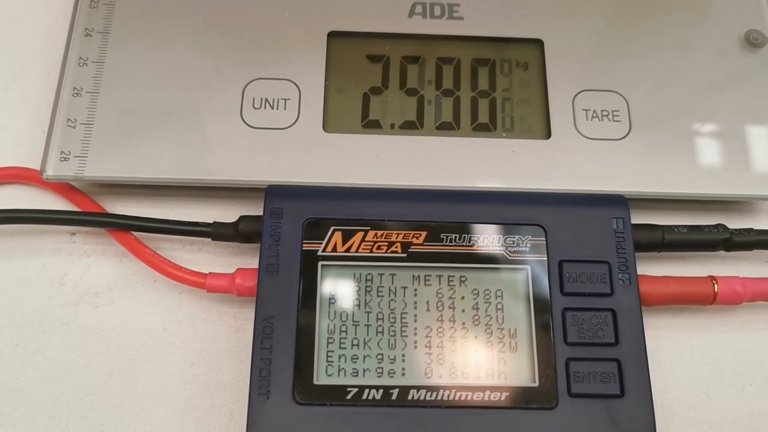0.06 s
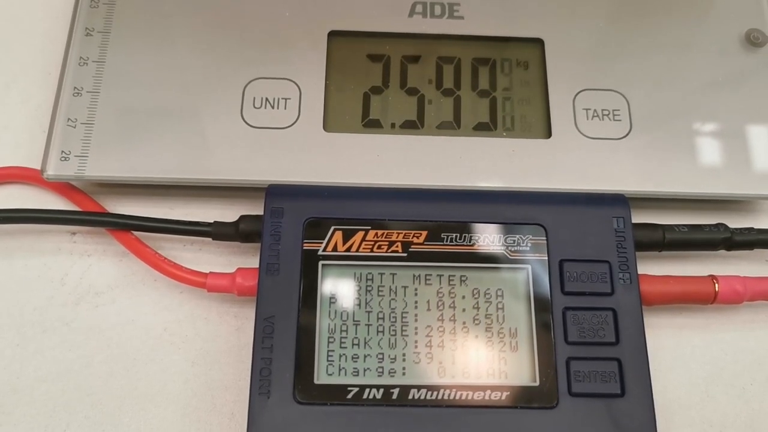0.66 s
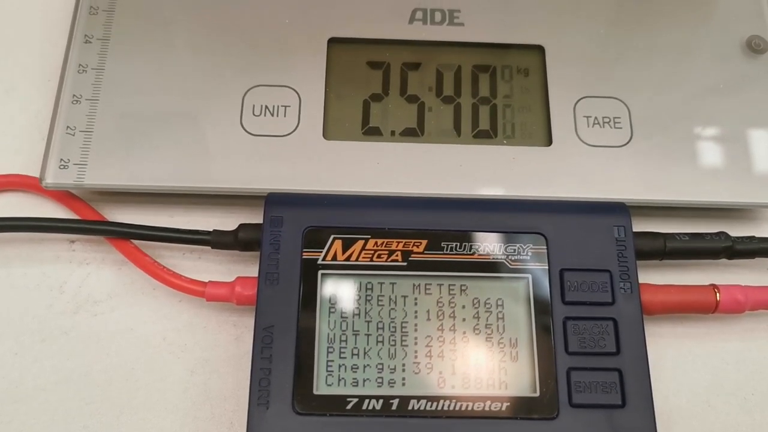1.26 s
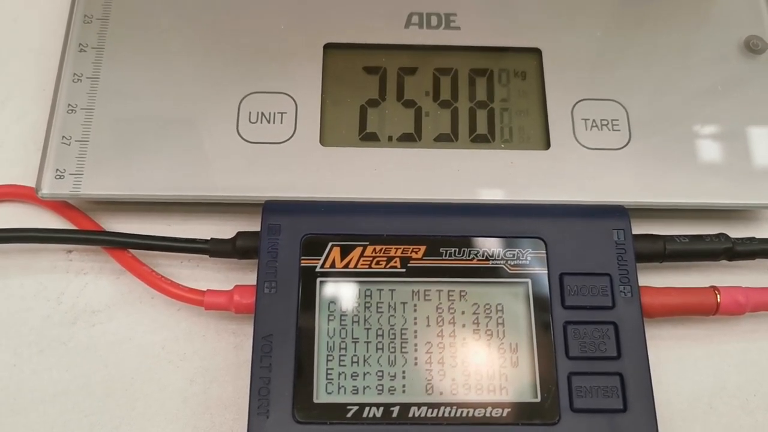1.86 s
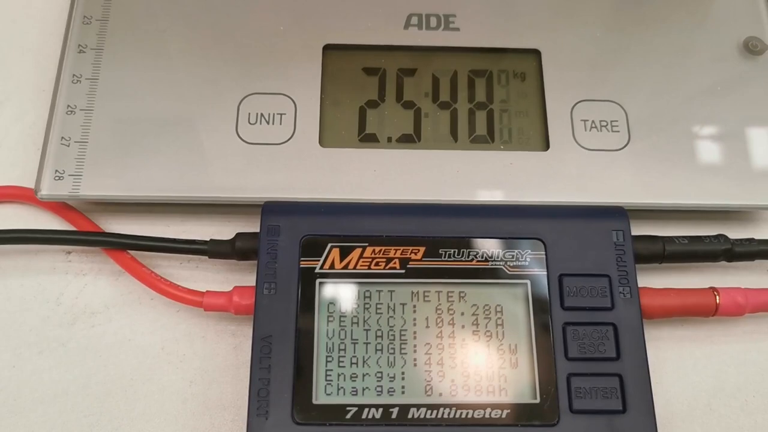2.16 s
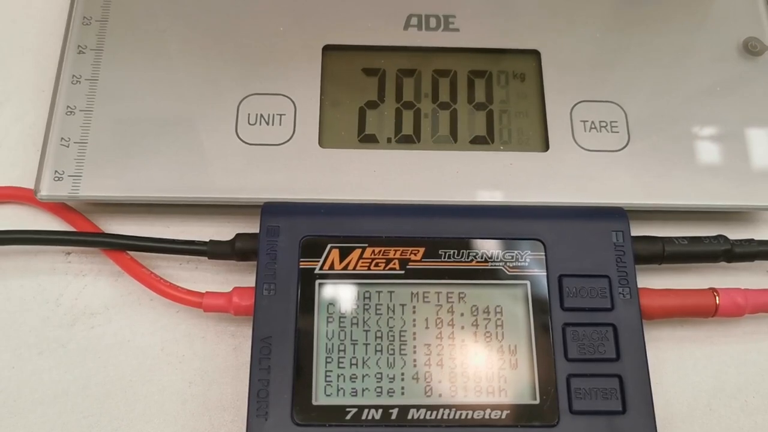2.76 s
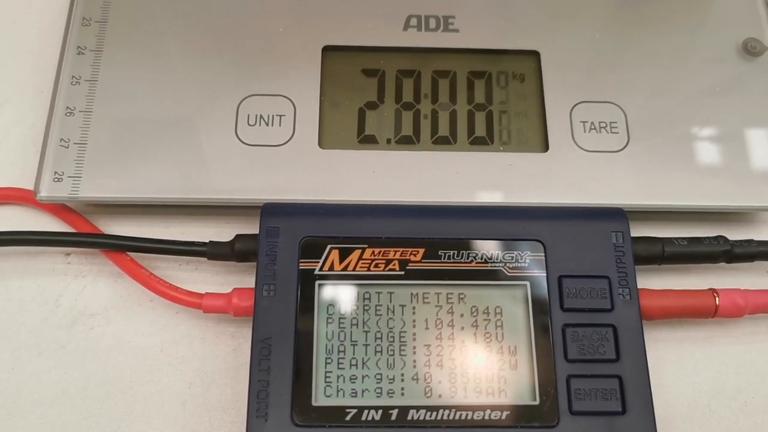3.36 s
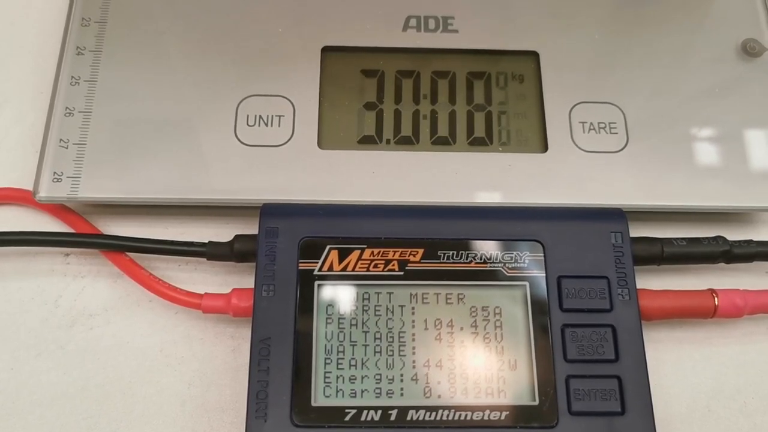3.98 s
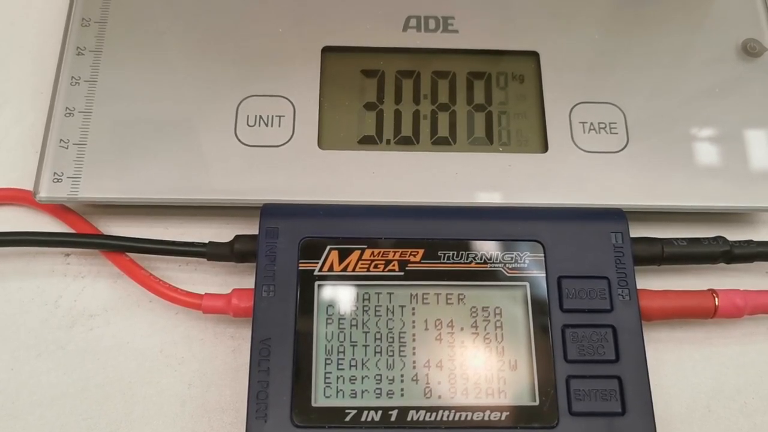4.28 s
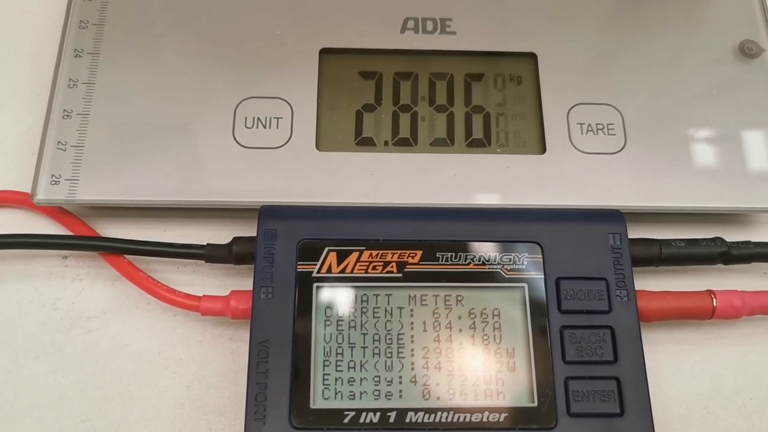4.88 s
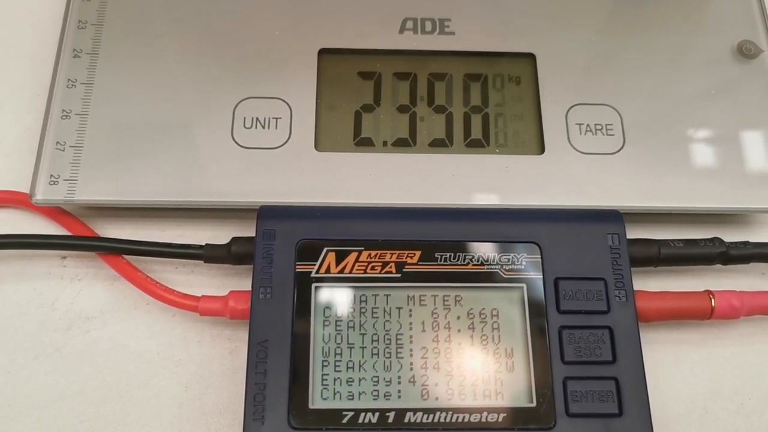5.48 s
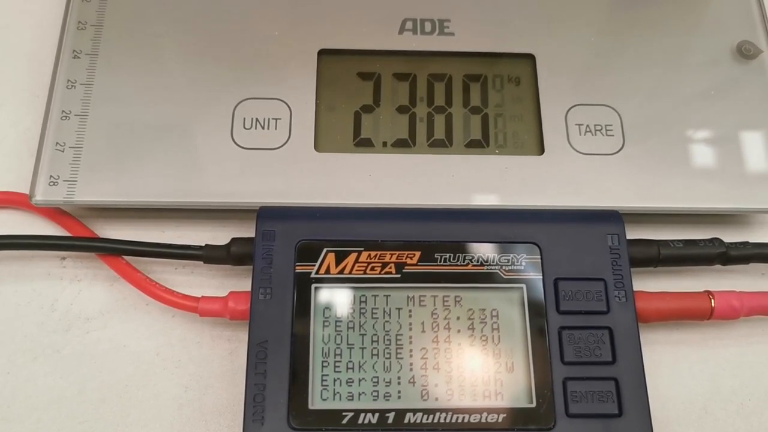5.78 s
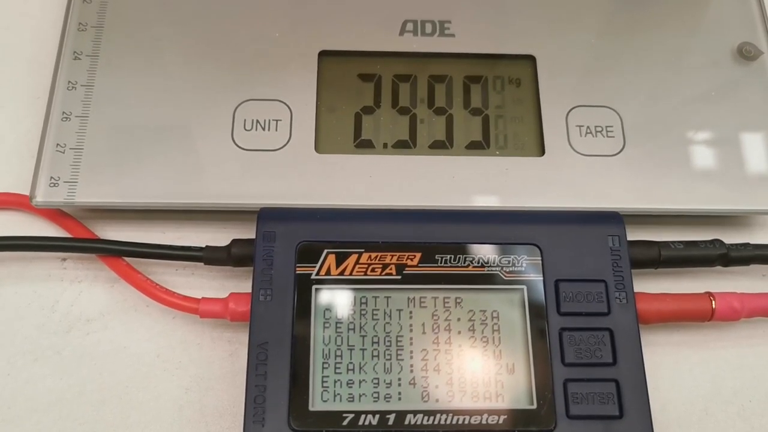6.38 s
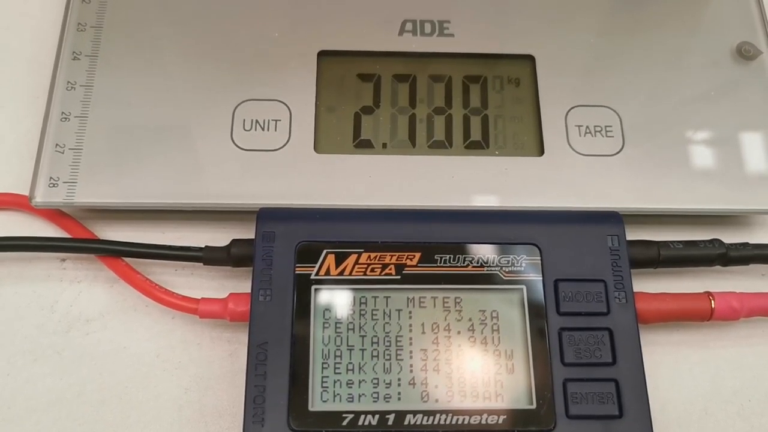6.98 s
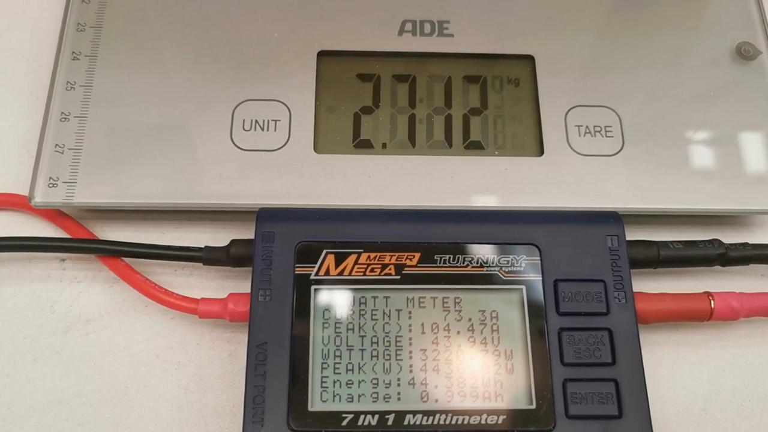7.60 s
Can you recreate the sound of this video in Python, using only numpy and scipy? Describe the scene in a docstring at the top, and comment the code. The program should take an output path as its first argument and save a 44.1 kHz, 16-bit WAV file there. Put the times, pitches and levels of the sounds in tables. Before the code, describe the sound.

Close up in a small room, an electric ducted fan is already running hard, with a shrill whine above rushing, hissing air. After about two seconds it speeds up, and a bearing sings faintly at the top. The wavering whine then drops lower than it began, rises again and settles. Soft gusts buffet the microphone underneath.

```python
"""A twelve-blade electric ducted fan runs near full power on a stand in a small room, close to a phone.
At first the blades whine at a steady pitch over the jet's roar, the inlet's hiss and a draught that
buffets the microphones. From 2.2 s the fan speeds up: the gliding whine flutters against its own echo,
and around 4 s a bearing sings at top speed. By 5.2 s the pitch has sunk below where it began;
it then climbs part way back and holds from 6.4 s."""
import sys
import numpy as np
from scipy import signal
from scipy.fft import rfft, irfft
from scipy.io import wavfile
from scipy.ndimage import uniform_filter1d

SR = 44100
rng = np.random.default_rng(int(sys.argv[2]) if len(sys.argv) > 2 else 0)


def dump(signal):
    """Clip the signal to [-1, 1] and save it as 16-bit WAV at the path in sys.argv[1]."""
    limited = np.clip(np.atleast_2d(signal).T, -1, 1)
    pcm = np.round(limited * 32767).astype(np.int16)
    wavfile.write(sys.argv[1], SR, pcm)


N = 341329
TIME = np.arange(N) / SR
FREQ = np.maximum(np.arange(N // 2 + 1) * SR / N, 1)
SIDES = np.array([[1], [-1]])  # opposite signs for the left and right microphone ports


def blade_whine(phase, blade_hz, unsettled):
    """Periodic blade loading radiates a tone; a glide drags standing-wave nodes across the ports."""
    # how the whine carries at each blade rate: f/Hz, left level/dB, right level/dB
    carry = [(6730, -15, -14.5), (6832, -20, -12.5), (7045, -17, -16), (7050, -18.5, -18),
             (7260, -19.5, -19.5), (7500, -20.5, -22.5), (7530, -22, -22)]
    # the left port passes through a node and its phase reverses: t/s, length/s
    flips = [(2.792, 0.027), (2.874, 0.043), (2.963, 0.055), (3.187, 0.017), (3.367, 0.042), (3.481, 0.022),
             (3.694, 0.024), (3.906, 0.069), (4.435, 0.041), (5.056, 0.057), (5.848, 0.072)]
    # a port drifts into a node: t/s, length/s, left gain/dB, right gain/dB
    dips = [(.48, 0.29, -9.5, -0.5), (0.823, 0.26, -4.5, -1), (1.287, 0.6, -5.5, 0),
            (2.526, 0.023, -12, -15), (3.126, 0.017, -12, -13), (3.286, 0.011, -10, -9),
            (4.242, 0.012, -9, -11), (5.586, 0.083, -4, -6.5), (5.864, 0.049, 0.5, -0.5),
            (5.98, .06, -4, -1), (6.11, 0.028, -6, -5)]
    node_hz, node_width_hz, node_rad = 6768, 31, 3.18  # at this pitch a node lies between the ports
    flutter_rad, flutter_hz = 0.41, 30  # the phase between the ports shakes during a glide
    tone = in_room(np.exp(1j * phase), t60=0.37, shared_db=8, own_db=-6, hold_s=0.051, flatten=0.38)
    port_phase = node_rad * np.exp(-((blade_hz - node_hz) / node_width_hz) ** 2)
    port_phase += flutter_rad * unsettled * wander(flutter_hz)
    tone = tone * ragged(0, depth=0.059, hz=156) * np.exp(0.5j * SIDES * port_phase)
    tone[0] *= 1 - 2 * np.minimum(sum(swell(t, length) for t, length in flips), 1)
    dip_db = sum(np.array([[left], [right]]) * swell(t, length) for t, length, left, right in dips)
    return tone.real * undb(by_speed(carry, blade_hz) + dip_db)


def blade_octave(phase, blade_hz, unsettled, surge_db):
    """The second harmonic of blade passage follows the surges and gains on the right during a glide."""
    # how the octave carries at each blade rate: f/Hz, left level/dB, right level/dB
    carry = [(6720, -34, -28), (7080, -28, -33.5), (7080, -29.5, -29), (7700, -38, -34)]
    tone = ragged(2 * phase, depth=0.067, hz=60)
    tone = in_room(tone, t60=0.45, shared_db=4.5, own_db=-7, hold_s=0.48, flatten=0)
    level_db = by_speed(carry, blade_hz) + 0.96 * surge_db
    level_db[1] += 8.5 * unsettled
    return undb(level_db) * (tone * ragged(0, depth=0.17, hz=45)).real


def folded_whine(phase, blade_hz, unsettled):
    """Aliasing: the converter folds the ultrasonic fifth harmonic down, so it glides the opposite way."""
    # strength of the alias at each blade rate: f/Hz, level/dB
    strength = [(6765, -44), (6810, -58), (7030, -39.5), (7270, -42), (7500, -57), (7700, -51)]
    converter_hz = 48000
    tone = ragged(2 * np.pi * converter_hz * TIME - 5 * phase, depth=0.6, hz=35)
    tone = in_room(tone, t60=0.25, shared_db=-13, own_db=-7, hold_s=0.25, flatten=0)
    return undb(by_speed(strength, blade_hz) - 4 * unsettled + wander(7.7) - SIDES * 3.3) * tone.real


def machinery(shaft_phase, blade_hz, unsettled):
    """Forced vibration: rotor and motor hum most at steady speed; shaft and bearing sing near the top."""
    # rotor unbalance and motor: multiple of the shaft rate, level/dB
    hum_orders = [(4, -47.5), (6, -51), (8, -48), (10, -56), (11, -56), (16, -58), (22, -66)]
    # shaft wobble, a bearing and its mixing with the blade tones: multiple of the shaft rate, level/dB
    strain_orders = [(1, -51), (2, -48), (5.43, -43), (6.57, -49), (17.43, -69), (18.57, -40)]
    strain = np.clip((blade_hz - 7300) / 300, 0, 1)
    hum = order_tones(shaft_phase, hum_orders, depth=0.56, hz=5.1)
    singing = order_tones(shaft_phase, strain_orders, depth=2.6, hz=7.8)
    return (1 - unsettled) * hum + strain * singing


def air_stream(throttle, unsettled, surge_db):
    """Broadband flow noise: the rush flutters in level, and swings left and right as the pitch glides."""
    swing_db = 3 * unsettled * wander(28)
    left_db = -24.5 - 0.5 * throttle + 0.5 * unsettled + surge_db[0] - 0.65 * swing_db
    right_db = -28 + 5 * throttle + 4.5 * unsettled + surge_db[1] + swing_db
    roar = jet_roar() * undb([left_db, right_db])
    flutter_db = wander(24)
    hiss = inlet_hiss(throttle, unsettled, surge_db, roar_lean_db=left_db - right_db)
    return (roar + hiss) * undb(flutter_db)


def jet_roar():
    """Resonance of duct and stand colours the jet's noise; long waves reach both ports partly coherent."""
    # jet spectrum at each port: f/Hz, relative spectrum level/dB
    left_spectrum = [(20, -6), (120, -3), (300, -1), (450, -2), (800, -3.5), (1100, 0.5), (1400, -1.5),
                     (2700, -1.5), (3200, -4), (4800, -5), (6000, -9), (7800, -15), (10500, -22),
                     (15500, -5.5)]
    right_spectrum = [(20, 2), (150, 0.5), (480, -1), (700, 1.5), (1000, 0.5), (1400, 2.5), (1900, -5.5),
                      (2800, -0.5), (3200, -5), (6000, -4), (7800, -10), (9800, -16), (11800, -5),
                      (15500, -8)]
    # resonances of duct and stand: f/Hz, width/Hz, left gain/dB, right gain/dB
    resonances = [(625, 99, 6, 6.5), (725, 103, 3, 5), (948, 66, 7, -1), (1140, 75, 7.5, -3),
                  (1242, 47, 2, 6.5), (1560, 120, -2, 1), (2205, 950, 0.5, 7.5), (3470, 280, 1, 0),
                  (10880, 280, 12, 13.5), (12800, 1300, -20, 1)]
    right_lag_s = 0.00012
    duct_db = sum(np.array([[left], [right]]) / (1 + (2 * (FREQ - hz) / width) ** 2)
                  for hz, width, left, right in resonances)
    shape = undb(np.array([colour(left_spectrum), colour(right_spectrum)]) + duct_db)
    alike = 0.25 / (1 + (FREQ / 900) ** 4)
    shared, *own = rfft(rng.standard_normal((3, N)))
    shared = shared * np.exp(1j * np.pi * FREQ * right_lag_s * SIDES)
    left, right = irfft(shape * (np.sqrt(alike) * shared + np.sqrt(1 - alike) * np.array(own)), N)
    return np.array([unit(left), unit(right)])


def inlet_hiss(throttle, unsettled, surge_db, roar_lean_db):
    """Flow noise at the inlet grows with speed and in glides; its left-right balance follows the roar's."""
    # inlet spectrum: f/Hz, relative spectrum level/dB
    spectrum = [(20, -44), (4000, -61), (6500, 12.5), (8500, 5), (10500, 11.5), (13000, 7), (15500, 6)]
    level_db = -34.4 + 3.5 * np.maximum(throttle, 0) + 1.6 * unsettled + 0.96 * surge_db.mean(axis=0)
    lean_db = 0.3 * roar_lean_db - 0.6
    return pair(colour(spectrum), alike=1) * undb(level_db + wander(28) + SIDES * lean_db / 2)


def draught():
    """Turbulent pressure rumbles on each port almost independently; a few gusts hit harder."""
    # course of the draught: t/s, relative level/dB, left minus right/dB
    course = [(0.0, -42, -2), (0.21, -41, 11), (0.34, -40.5, -14.5), (0.97, -37.5, -4), (2.18, -36.5, 2),
              (2.24, -35, -21), (2.35, -36, -1.5), (3.86, -33.5, 17), (4.46, -30.5, 3), (5.02, -33.5, -10),
              (5.41, -43, 2), (5.65, -40, -13.5), (6.14, -29.5, -9), (6.45, -35.5, 1.5),
              (7.59, -36.5, -2.0), (7.74, -38, -4)]
    # draught spectrum: f/Hz, relative spectrum level/dB
    spectrum = [(5, -3), (25, -2), (50, -6), (100, -10.5), (200, -18.5), (500, -20.5), (2000, -64)]
    # single gusts: t/s, length/s, level/dB, upper edge f/Hz
    gusts = [(2.713, 0.097, -24.5, 90), (3.356, 0.11, -25, 120), (3.816, .1, -29.5, 80),
             (4.546, 0.069, -25, 333), (5.04, 0.068, -32, 109), (6.15, 0.14, -32, 120)]
    level_db, pan_db = curves(course)
    share = undb(SIDES * pan_db / 2)
    rumble = pair(colour(spectrum), alike=0.035) * undb(level_db + 2.6 * wander(7.5))
    rumble *= 1.7 * share / np.hypot(*share)
    for t, length, db, edge_hz in gusts:
        push = np.exp(-2 * ((TIME - t) / length) ** 2)
        rumble += undb(db) * push * pair(-20 * np.log10(1 + (FREQ / edge_hz) ** 2), alike=0.077)
    return rumble


def flow():
    """Shaft speed sets the blade rate and throttle (0 cruise, 1 full); its change sets unrest (0-1)."""
    # blade-passing rate: t/s, f/Hz
    speed = [(0.0, 7043), (0.73, 7029), (2.22, 7022), (2.93, 7472), (3.14, 7489), (3.43, 7650),
             (3.74, 7654), (4.07, 7700), (4.2, 7698), (4.29, 7619), (4.46, 7523), (4.58, 7182),
             (4.86, 7007), (5.08, 6786), (5.23, 6763), (5.49, 6771), (5.97, 6879), (6.4, 7247),
             (6.67, 7247), (6.77, 7273), (7.74, 7264)]
    cruise_hz, full_hz, half_unsettled_hz_per_s = 7025, 7700, 240
    blade_hz = smooth(curves(speed)[0], 0.022)
    glide = smooth(np.abs(np.gradient(blade_hz)) * SR, 0.13)
    throttle = (blade_hz - cruise_hz) / (full_hz - cruise_hz)
    unsettled = glide / (glide + half_unsettled_hz_per_s)
    return blade_hz + 1.02 * wander(6.1), throttle, unsettled


def surges(edge_s=0.0045):
    """Amplitude modulation of the rush, in dB at each port: each surge or lull sets in, holds and ends."""
    # surges and lulls: t/s, length/s, left gain/dB, right gain/dB
    events = [(0.222, 0.22, -0.5, -3), (0.476, 0.18, 1, 0), (.81, 0.16, 0.5, 3.5), (1.029, .08, -0.5, -3.5),
              (1.414, 0.054, 2, 5), (1.95, 0.65, -1, -0.5), (2.395, .15, 0, 2), (2.484, 0.029, -0.5, -6),
              (2.855, 0.033, -0.5, -4.5), (2.907, 0.038, 3, 0.5), (3.058, 0.21, 0, 2.5),
              (3.523, 0.2, -0.5, -1), (3.906, 0.13, -6, 2.5), (4.096, 0.26, -3.5, -4), (4.25, 0.04, 1, 0.5),
              (4.608, 0.056, 0, -1), (5.08, 0.026, -1, 6), (5.3, .33, -2.5, -3), (5.61, 0.14, 0, 6),
              (5.756, 0.04, -0.5, -4), (5.86, .11, -0.5, 5), (5.944, 0.059, 0, -7), (6.357, 0.042, 1, 3.5),
              (6.604, 0.16, 1.5, 2.5), (6.893, 0.31, 1, -2.5), (7.12, 0.1, 1.5, 2), (7.643, .2, 1, -2.5)]
    gain_db = 0
    for t, length, left, right in events:
        held = 0.5 + 0.5 * np.tanh((length / 2 - np.abs(TIME - t)) / edge_s)
        gain_db += np.array([[left], [right]]) * held
    return gain_db


def in_room(tone, t60, shared_db, own_db, hold_s, flatten):
    """Interference: a gliding tone beats with its echoes; flattening the crests leaves brief dropouts."""
    shared = tone + undb(shared_db) * echoes(tone, t60)
    ports = np.array([shared + undb(own_db) * echoes(tone, t60) for _ in range(2)])
    ports = ports / np.sqrt(smooth(np.abs(ports) ** 2, hold_s))  # even out slow changes of level
    ports = ports / (1 + np.abs(ports) ** 2) ** flatten
    return np.sqrt(2) * unit(ports)


def echoes(tone, t60):
    """Reverberation: dense reflections decay exponentially, by 60 dB in t60 seconds."""
    t = TIME[:SR // 2]
    response = rng.standard_normal(len(t)) * np.exp(-np.log(1000) * t / t60)
    response /= np.linalg.norm(response)
    lead_in = np.conj(tone[len(t):0:-1]) * np.exp(2j * np.angle(tone[0]))  # the fan is already running
    return signal.fftconvolve(np.r_[lead_in, tone], response)[len(t):len(t) + N]


def order_tones(shaft_phase, orders, depth, hz):
    """Superposition of wavering shaft orders, each with its own phase difference between the ports."""
    tones = 0
    for multiple, db in orders:
        port_phase = SIDES * rng.standard_normal() / 2
        line = unit(ragged(multiple * shaft_phase, depth, hz)) * np.exp(1j * port_phase)
        tones += undb(db) * np.sqrt(2) * line.real
    return tones


def ragged(phase, depth, hz):
    """Random modulation: eddies swallowed by the rotor give a tone sidebands of noise."""
    return np.exp(1j * phase) * (1 + depth * (wander(hz, order=2) + 1j * wander(hz, order=2)))


def pair(db, alike):
    """Partial coherence: the two ports share the fraction alike of their noise power."""
    return np.sqrt(alike) * noise(db) + np.sqrt(1 - alike) * np.array([noise(db), noise(db)])


def wander(hz, order=4):
    """Low-pass random motion of rms 1 that falls away above hz."""
    return noise(-10 * np.log10(1 + (FREQ / hz) ** order))


def noise(db):
    """White noise filtered to the given spectrum, at rms 1."""
    return unit(irfft(rfft(rng.standard_normal(N)) * undb(db), N))


def colour(points):
    """A spectrum in dB, interpolated on a log-frequency axis."""
    hz, db = np.transpose(points)
    return np.interp(np.log(FREQ), np.log(hz), db)


def curves(table):
    """Each column of a table, interpolated in time."""
    t, *columns = np.transpose(table)
    return np.array([np.interp(TIME, t, column) for column in columns])


def by_speed(table, blade_hz):
    """Each column of a table, interpolated at the blade rate."""
    hz, *columns = np.transpose(table)
    return np.array([np.interp(blade_hz, np.sort(hz), column) for column in columns])


def swell(t, length):
    """A flat-topped window of height 1, half as high at its edges."""
    return 0.5 ** ((2 * (TIME - t) / length) ** 4)


def smooth(x, seconds):
    """Running mean, taken twice."""
    size = max(int(seconds * SR), 1)
    return uniform_filter1d(uniform_filter1d(x, size), size)


def unit(x):
    """Normalisation to rms 1."""
    return x / np.sqrt(np.mean(np.abs(x) ** 2))


def undb(db):
    """Decibels to amplitude ratio."""
    return 10 ** (np.asarray(db) / 20)


def scene():
    """Superposition: one shaft speed drives the tones and the air stream, with the draught beneath."""
    blades = 12
    blade_hz, throttle, unsettled = flow()
    phase = 2 * np.pi * np.cumsum(blade_hz) / SR
    surge_db = surges()
    tones = blade_whine(phase, blade_hz, unsettled)
    tones += blade_octave(phase, blade_hz, unsettled, surge_db)
    tones += folded_whine(phase, blade_hz, unsettled)
    tones += machinery(phase / blades, blade_hz, unsettled)
    return tones + air_stream(throttle, unsettled, surge_db) + draught()


def record(dry):
    """Band limiting: the phone's low-pass filter cuts the top steeply."""
    top_hz = 15700
    return signal.sosfilt(signal.ellip(12, 0.2, 80, top_hz, fs=SR, output="sos"), dry)


dry = scene()
out = record(dry)
dump(out)
```